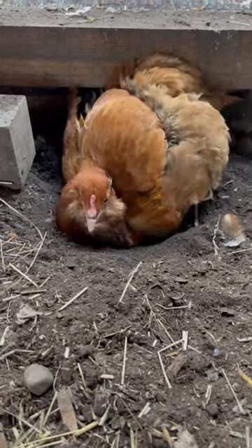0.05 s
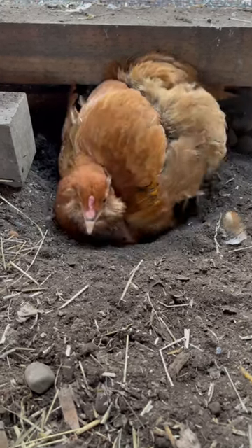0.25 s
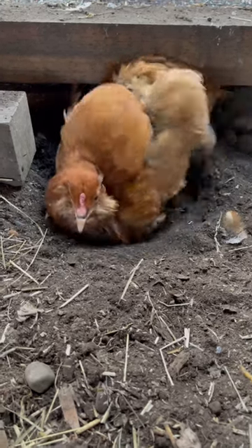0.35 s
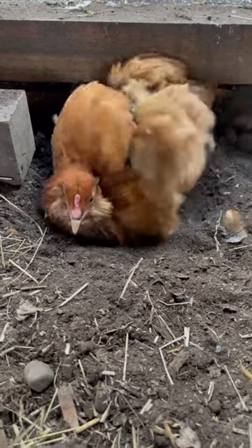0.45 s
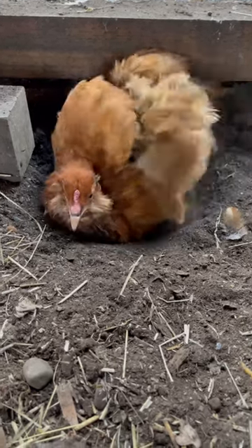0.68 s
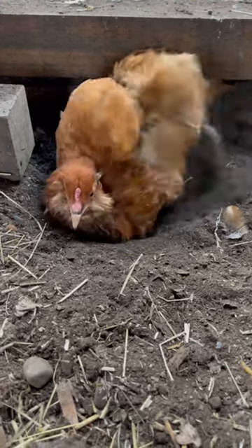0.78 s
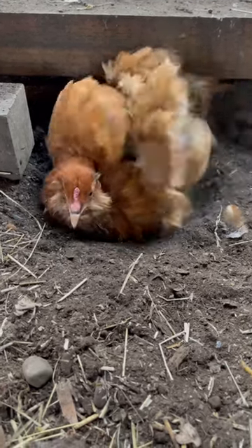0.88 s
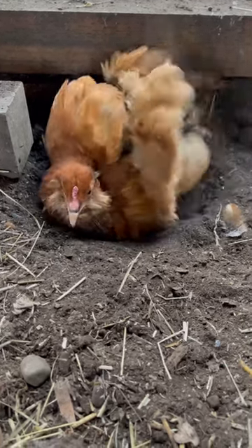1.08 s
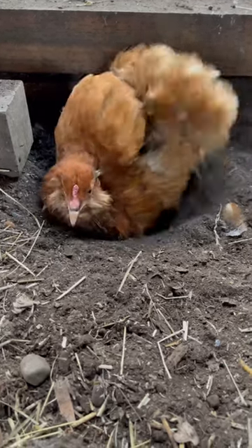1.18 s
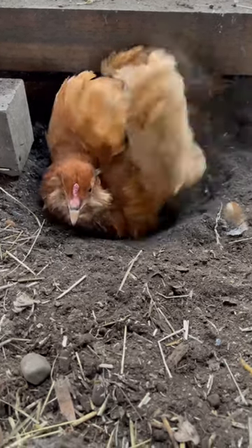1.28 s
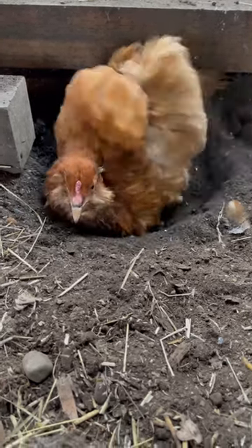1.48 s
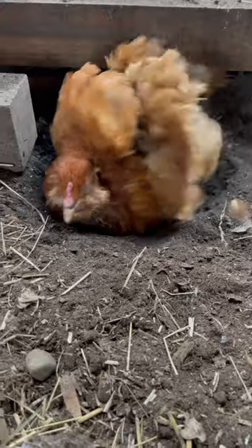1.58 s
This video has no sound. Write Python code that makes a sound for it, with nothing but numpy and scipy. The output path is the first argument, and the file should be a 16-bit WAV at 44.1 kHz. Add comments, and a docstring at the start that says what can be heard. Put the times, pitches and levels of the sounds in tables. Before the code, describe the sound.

Close handling noise on the microphone squeaks and creaks loudly, interrupting small birds and a low machine hum in a quiet yard. Once it stops, a dust-bathing hen's feathers swish faintly and dry soil patters under more chirps.

```python
"""Small birds chirp over a low machine hum in a quiet yard; then a loud, creaking rub covers them
for a second, most likely a finger dragging on the microphone's casing. It sticks and slips some
300 times a second, and every slip knocks the casing's resonances. After it a hen is heard taking
a dust bath: feathers swish and dry soil patters while the birds chirp again."""
import sys
import numpy as np
from scipy import signal
from scipy.fft import rfft, irfft, next_fast_len
from scipy.io import wavfile
from scipy.ndimage import uniform_filter1d, minimum_filter1d

SR = 44100
rng = np.random.default_rng(int(sys.argv[2]) if len(sys.argv) > 2 else 0)


def file_out(sig):
    """Save sig as 16-bit WAV at sys.argv[1]."""
    # one column per channel
    cols = np.atleast_2d(sig).T
    # limit, then scale
    lim = np.clip(cols, -1, 1)
    pcm = np.round(lim * 32767).astype(np.int16)
    wavfile.write(sys.argv[1], SR, pcm)


N = 72765
T = np.arange(N) / SR


def drag():
    """Uneven stick-slip: each bite sets off sharp slips, which soften to a glide until the next."""
    # drag force: time_s, level_db
    force = [(.293, -15), (.301, -9.5), (.314, -4.5), (.33, -8), (.345, -9), (.372, -2), (.49, -2.5),
             (.53, 0), (.85, -3), (1.04, 1), (1.11, -2), (1.19, -6.5), (1.203, -3.5), (1.216, -36)]
    # runs of sharp slips: start_s, length_s, knock_db, sharp_db
    bites = [(0.29, .005, -2, -8), (0.301, .031, 0.5, -9.5), (0.363, .035, -2, -10.5),
             (.412, .017, -2, -14), (0.436, .012, -1, -8), (0.458, .016, -4, -10.5),
             (0.479, .016, -0.5, -8), (.512, 0.043, -0.5, -4.5), (0.579, 0.036, 0.5, -4.5),
             (0.619, .02, -4, -4.5), (0.64, .018, 0.5, -2.5), (0.67, 0.013, 1, -5.5), (0.692, 0.0092, 0, 0),
             (0.707, .02, 3, -1.5), (.739, .027, 0.5, -2.5), (.774, .054, 1.5, -2.5), (0.826, 0.042, 4, 1),
             (0.882, .012, 1.5, -7), (0.907, .033, 1.5, -1.5), (.947, .05, -0.5, -5.5),
             (1.009, .007, 3.5, -4), (1.026, .03, 1.5, -1.5), (1.061, .022, -2, -4.5),
             (1.087, .012, -1.5, -7), (1.115, .016, -2, -3), (1.13, .012, 2.5, -2.5),
             (1.15, 0.039, 0.5, 1.5), (1.177, 0.016, 5, -3)]
    # middle casing resonances: freq_hz, width_hz, left_db, right_db
    ring_modes = [(2773, 510, -29, 6), (3490, 730, 1.5, -2), (3886, 180, 4.5, 3), (5270, 250, -2.5, 1.5),
                  (6360, 1400, -10, -13), (7280, 166, -2.5, -2.5)]
    # microphone port resonances: freq_hz, width_hz, left_db, right_db
    port_modes = [(11120, 870, -3, -3.5), (11920, 730, -11, -9), (12030, 240, -10.5, -3.5)]
    slip_hz, slip_jitter = 300.3, 0.2
    accent_db, accent_s = 1, 0.0065
    glide_knock_db, glide_sharp_db = -6, -8.5
    knocks, rings, ticks = 0, 0, 0
    ends_s = [bite[0] for bite in bites[1:]] + [force[-1][0]]
    for (start_s, length_s, knock_db, sharp_db), end_s in zip(bites, ends_s):
        chance = rng.standard_normal((60, 3))
        waits_s = np.exp(slip_jitter * chance[:, 0]) / slip_hz
        age_s = np.cumsum(waits_s) - waits_s
        in_run = start_s + age_s < end_s
        chance, age_s = chance[in_run], age_s[in_run]
        slips_s, biting = start_s + age_s, age_s < length_s
        force_db = np.interp(slips_s, *np.transpose(force)) + 1.5 * chance[:, 1]
        force_db += accent_db * np.exp(-age_s / accent_s)
        edge_db = sharp_db + np.where(biting, 0, glide_sharp_db)
        knocks += clicks(slips_s, force_db + 14.5 + np.where(biting, knock_db, glide_knock_db))
        rings += clicks(slips_s, force_db - 12 + 0.61 * edge_db + 2 * chance[:, 2])
        ticks += clicks(slips_s, force_db - 4.5 + edge_db + 3 * chance[:, 2])
    ring = resonate(cut(grainy(rings, share=0.078), 2220, "high"), ring_modes)
    tick = resonate(cut(grainy(ticks, share=0.022), 9430, "high", order=6), port_modes)
    return knock(knocks) + port_lag(ring + tick)


def grab():
    """The first touch squeaks: a few hard, evenly spaced slips."""
    # slip bursts: start_s, length_s, knock_db, crack_db
    bursts = [(0.2264, .002, -11, -11.5), (.2332, .0135, -2, -3.5), (0.2505, .0095, -3, -12.5)]
    # resonances of the crack: freq_hz, width_hz, left_db, right_db
    crack_modes = [(1320, 120, 15, 15.5), (2240, 610, 3.5, 9), (2880, 750, 0, 9.5), (4060, 500, 2, 7.5),
                   (5510, 140, -2, -4), (6760, 1200, -22, -15), (10450, 790, -9.5, -9)]
    slip_hz = 339.2
    slips = [(start_s + age_s, knock_db, crack_db)
             for start_s, length_s, knock_db, crack_db in bursts
             for age_s in np.arange(0, length_s, 1 / slip_hz)]
    slips_s, knock_db, crack_db = np.transpose(slips)
    cracks = grainy(clicks(slips_s, crack_db - 4), share=0.14)
    crack = resonate(cut(cracks, 1390, "high"), crack_modes)
    return knock(clicks(slips_s, knock_db + 16.5)) + port_lag(crack)


def knock(slips):
    """The soft part of the slips rings the casing's low resonances."""
    # low casing resonances: freq_hz, width_hz, left_db, right_db
    body_modes = [(177, 72, -9, -10.5), (311, 106, -5.5, -2.5), (563, 79, 0, 7.5), (696, 67.7, -5.5, 10),
                  (817, 167, -1.5, 9), (1066, 213.5, -1, 5.5), (1262.5, 40, -22, 0.5),
                  (1480, 1000, -26.5, -17.5), (2065, 136, -12, -10.5)]
    body = resonate(grainy(slips, share=0.047), body_modes)
    return cut(body, 1760, "low", order=5)


def grainy(slips, share):
    """Each slip trails a puff of friction noise."""
    return slips + share * trail(slips, decay_s=0.0037) * rng.standard_normal(N)


def resonate(x, modes):
    """Parallel resonances of alternating sign, each with its own gain at the two ports."""
    out = np.zeros((2, N))
    for k, (hz, width_hz, left_db, right_db) in enumerate(modes):
        radius = np.exp(-np.pi * width_hz / SR)
        forward = np.array([1, 0, -1]) * (1 - radius ** 2) / 2
        feedback = [1, -2 * radius * np.cos(2 * np.pi * hz / SR), radius ** 2]
        ring = signal.lfilter(forward, feedback, x + 1e-18)
        out += (-1) ** k * from_db([[left_db], [right_db]]) * ring
    return out


def port_lag(treble, lag_s=0.00016):
    """The treble reaches the right port later."""
    left, right = treble
    size = next_fast_len(N + SR)
    delay = np.exp(-2j * np.pi * np.fft.rfftfreq(size, 1 / SR) * lag_s)
    return np.array([left, irfft(rfft(right, size) * delay, size)[:N]])


def lift(centre_s=1.21, width_s=0.0072, pitch_hz=183, level_db=-28):
    """The casing thuds softly as the contact lets go."""
    age_s = T - centre_s
    return from_db(level_db) * np.exp(-(age_s / width_s) ** 2) * np.sin(2 * np.pi * pitch_hz * age_s)


def hen():
    """Each feather stroke pushes air and throws up dust; a few crumbs land hard."""
    # feather strokes: peak_s, rise_s, fall_s, swish_db, dust_db
    strokes = [(1.24, 0.02, 0.02, -52.5, -77), (1.337, 0.034, 0.056, -41, -66.5),
               (1.385, .018, 0.038, -66, -56), (1.431, 0.015, 0.022, -50.5, -58.5),
               (1.59, 0.12, 0.058, -55, -70), (1.645, 0.061, .03, -66, -62.5)]
    # feather noise: freq_hz, density_db
    swish_spectrum = [(120, -7), (230, -5.5), (400, -5), (700, -6.5), (950, -1), (1300, -26), (1800, -19.5),
                      (4000, -51)]
    # soil noise: freq_hz, density_db
    dust_spectrum = [(1200, -22), (2200, 0), (4000, -6.5), (5500, -0.5), (7500, -4), (9000, -37),
                     (11000, 5.5), (12500, -15), (14000, -32)]
    # crumb impacts: time_s, level_db
    landings = [(1.37, -49), (1.3827, -37.5), (1.4295, -64), (1.435, -55), (1.635, -58), (1.644, -48)]
    swish, dust = 0, 0
    for peak_s, rise_s, fall_s, swish_db, dust_db in strokes:
        swell = np.exp(-((T - peak_s) / np.where(T < peak_s, rise_s, fall_s)) ** 2)
        swish += from_db(swish_db) * swell
        dust += from_db(dust_db) * swell
    feathers = swish * noise(swish_spectrum)
    crumbs = trail(clicks(*np.transpose(landings)), decay_s=0.0011)
    grain_db = 5.5 * drift(rate_hz=650)
    return feathers + (dust * from_db(grain_db) + crumbs) * noise(dust_spectrum)


def birds():
    """Short whistled glides with a weak overtone, scattered by the yard."""
    # chirps: start_s, length_s, first_hz, middle_hz, last_hz, level_db, overtone_db, pan_db
    chirps = [(-.01, 0.053, 3290, 3230, 2650, -48.5, -9, 3.5),
              (.01, 0.072, 5540, 4140, 3250, -57.5, -32, -13),
              (0.061, 0.041, 3930, 3600, 3160, -52.5, -42, -4),
              (0.184, 0.054, 5380, 5600, 5300, -68, -40, 14),
              (.256, 0.035, 4560, 3680, 3100, -43.5, -49, -5),
              (1.315, .048, 3250, 3186, 3170, -54.5, -35, -4),
              (1.334, .045, 3630, 3810, 3450, -64.5, -35, 0), (1.378, 0.051, 3470, 3356, 3200, -51, -35, 5),
              (1.534, .04, 3240, 3757, 3500, -56.5, -35, 10), (1.557, 0.041, 3760, 3570, 3340, -49, -16, 1),
              (1.59, .055, 3120, 2860, 2830, -68.5, -35, -17)]
    out = np.zeros((2, N))
    for start_s, length_s, *glide_hz, level_db, overtone_db, pan_db in chirps:
        progress = np.clip((T - start_s) / length_s, 0, 1)
        pitch_hz = np.polyval(np.polyfit([0, 0.5, 1], glide_hz, 2), progress)
        wobble = 1 + 0.0079 * drift(rate_hz=1100)
        phase = 2 * np.pi * np.cumsum(pitch_hz * wobble) / SR
        whistle = np.sin(phase) + from_db(overtone_db) * np.sin(2 * phase)
        flutter_db = 0.5 * drift(rate_hz=180)
        envelope = from_db(level_db + flutter_db) * np.sin(np.pi * progress)
        pan = from_db([[pan_db / 2], [-pan_db / 2]])
        out += pan * envelope * whistle
    return scatter(out)


def scatter(x, decay_s=0.025, delay_s=0.0029, wet_db=-4.5):
    """Fence and leaves add a short diffuse tail, different on each side."""
    age_s = T[:SR // 8]
    tail = rng.standard_normal((2, len(age_s))) * np.exp(-age_s / decay_s) * (age_s > delay_s)
    tail /= np.sqrt(np.sum(tail ** 2, axis=1, keepdims=True))
    return x + from_db(wet_db) * signal.fftconvolve(x, tail, axes=1)[:, :N]


def hum(lines_hz=(62.6, 99.3), waver_hz=3.67):
    """A distant machine hums on two wavering lines."""
    # rms of the hum lines: time_s, lower_db, upper_db
    levels = [(0, -51, -41.5), (.3, -50, -43.5), (.5, -48, -54.5), (1.2, -46, -52.5), (1.65, -48, -49)]
    times_s, *lines_db = np.transpose(levels)
    out = 0
    for hz, line_db in zip(lines_hz, lines_db):
        phase = 2 * np.pi * np.cumsum(hz + waver_hz * drift(rate_hz=14)) / SR
        out += np.sqrt(2) * from_db(np.interp(T, times_s, line_db)) * np.sin(phase)
    return out


def air(level_db=-47.5):
    """Still yard air: faint, steady, mostly low noise."""
    # background noise: freq_hz, density_db
    spectrum = [(25, -15), (45, -8), (75, 3.5), (130, -9), (200, -15), (350, -27), (620, -31.5),
                (1300, -27), (2000, -42), (3200, -36), (5000, -53.5), (7200, -34.5), (9000, -84),
                (11000, -34), (12500, -59), (14000, -82.5)]
    return from_db(level_db) * noise(spectrum)


def noise(spectrum):
    """Stereo noise shaped in third-octave bands, wider in the treble; rms 1."""
    # left-right likeness: freq_hz, correlation
    likeness = [(60, 1), (200, 0.98), (600, 0.28), (2000, 0.25), (6000, 0.13), (12000, 0.13)]
    edges_hz = np.geomspace(22, 15000, 29)
    white = rng.standard_normal((2, 2, N))
    out = 0
    for k, (low_hz, high_hz) in enumerate(zip(edges_hz, edges_hz[1:])):
        mid, side = cut(white[k % 2], [low_hz, high_hz], "band")
        centre_hz = np.sqrt(low_hz * high_hz)
        alike = at_hz(likeness, centre_hz)
        band = np.sqrt(1 + alike) * mid + np.sqrt(1 - alike) * side * [[1], [-1]]
        out += from_db(at_hz(spectrum, centre_hz)) * band
    return out / np.sqrt(np.mean(out ** 2))


def clicks(times_s, levels_db):
    """One impulse per time and level."""
    out = np.zeros(N)
    np.add.at(out, (times_s * SR).astype(int), from_db(levels_db))
    return out


def trail(x, decay_s):
    """Give each impulse an exponential decay."""
    return signal.lfilter([1], [1, -np.exp(-1 / (decay_s * SR))], x + 1e-18)


def drift(rate_hz):
    """Unit normal draws joined by straight lines."""
    knots = rng.standard_normal(4000)
    return np.interp(T * rate_hz, np.arange(len(knots)), knots)


def cut(x, hz, kind, order=2):
    """Butterworth filter."""
    return signal.sosfilt(signal.butter(order, hz, kind, fs=SR, output="sos"), x + 1e-18)


def at_hz(points, hz):
    """Interpolate on a log-frequency axis."""
    freqs_hz, values = np.transpose(points)
    return np.interp(np.log(hz), np.log(freqs_hz), values)


def from_db(db):
    """Decibels to gain."""
    return 10 ** (np.asarray(db) / 20)


def scene():
    """The rub on the casing in front; hen, birds and yard behind."""
    return grab() + drag() + lift() + hen() + birds() + air() + hum()


def record(dry):
    """A quick limiter holds the hardest slips down; the top is cut steeply."""
    threshold_db, release_db_per_s, limit_share, stopband_hz = -9, 503.5, 0.71, 14400
    peak_db = 20 * np.log10(np.abs(dry).max(axis=0) + 1e-9)
    over_db = np.maximum(peak_db - threshold_db, 0)
    release_db = release_db_per_s * T
    held_db = np.maximum.accumulate(over_db + release_db) - release_db
    gain_db = limit_share * uniform_filter1d(minimum_filter1d(-held_db, size=65), size=65)
    lowpass = signal.cheby2(14, 60, stopband_hz, fs=SR, output="sos")
    return signal.sosfilt(lowpass, dry * from_db(gain_db))


dry = scene()
out = record(dry)
file_out(out)
```